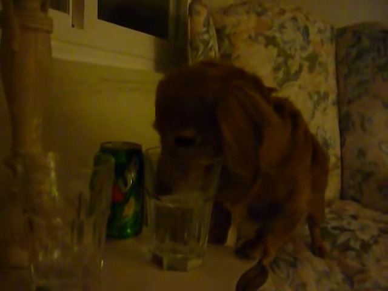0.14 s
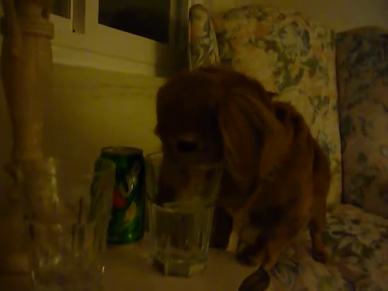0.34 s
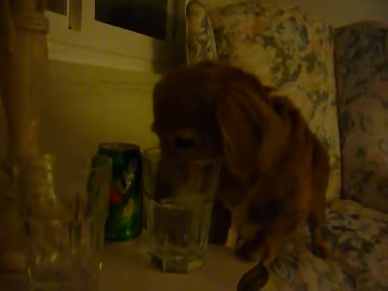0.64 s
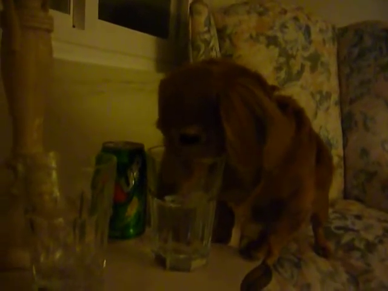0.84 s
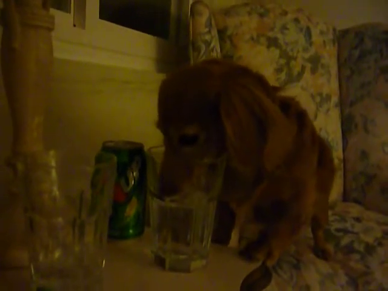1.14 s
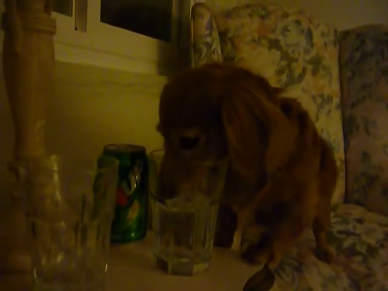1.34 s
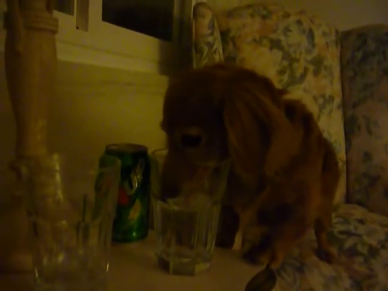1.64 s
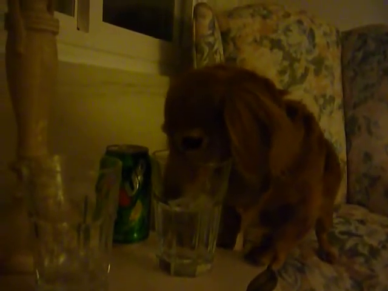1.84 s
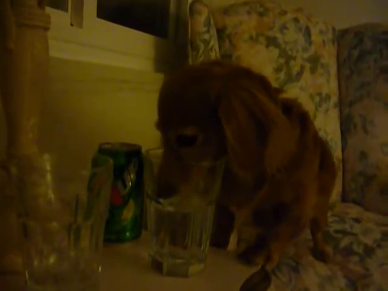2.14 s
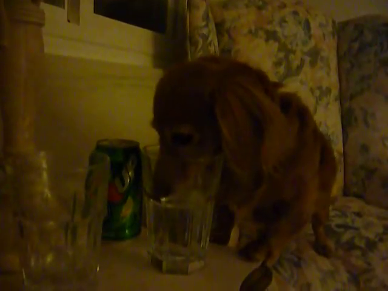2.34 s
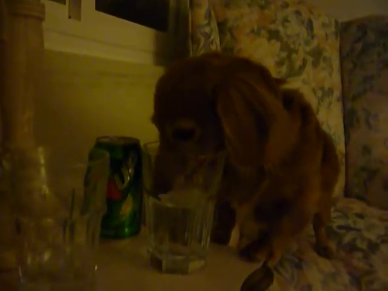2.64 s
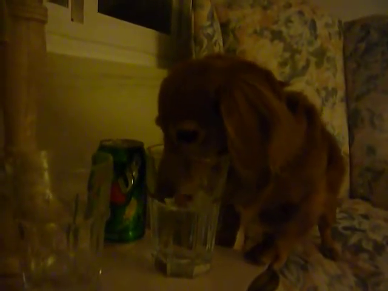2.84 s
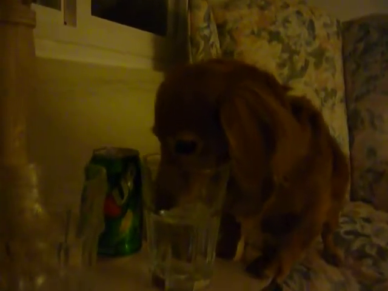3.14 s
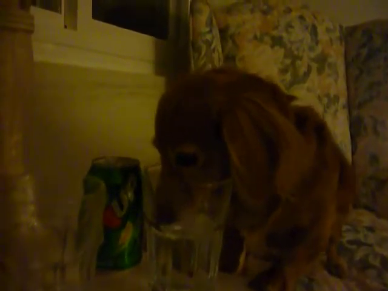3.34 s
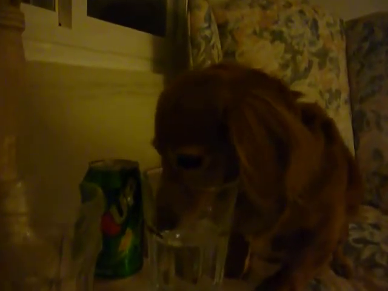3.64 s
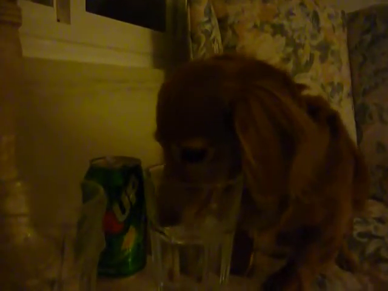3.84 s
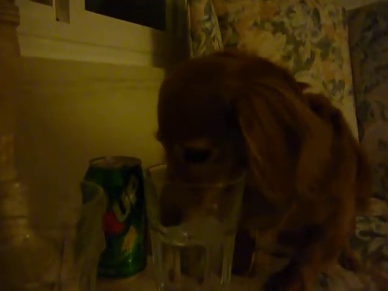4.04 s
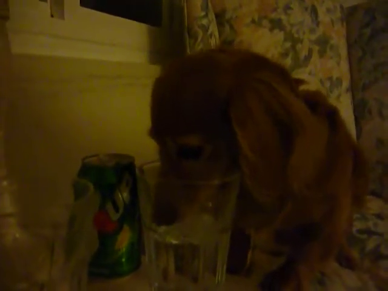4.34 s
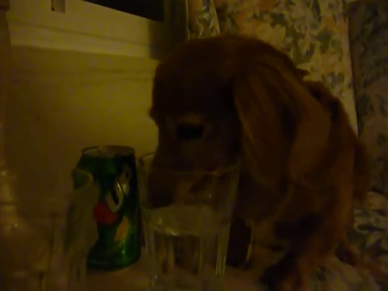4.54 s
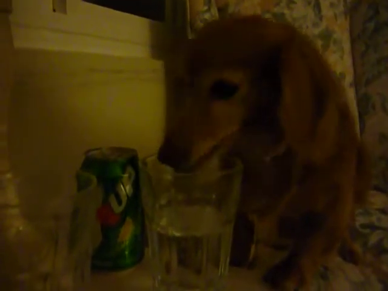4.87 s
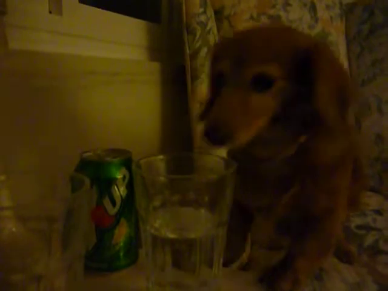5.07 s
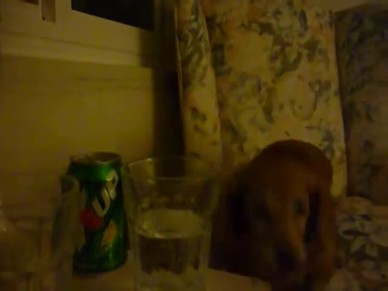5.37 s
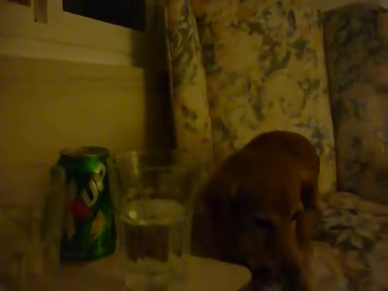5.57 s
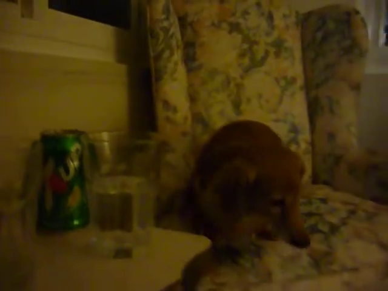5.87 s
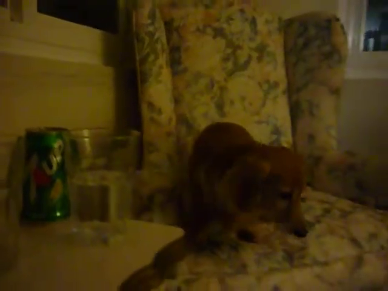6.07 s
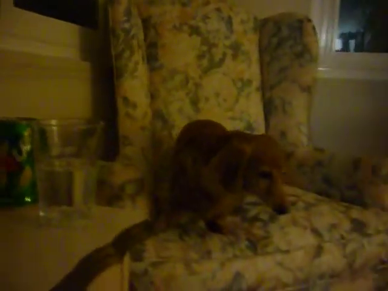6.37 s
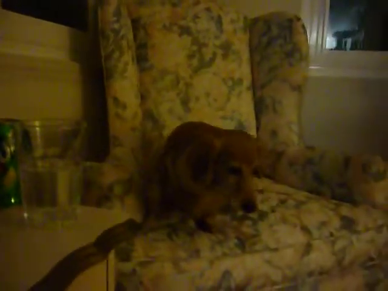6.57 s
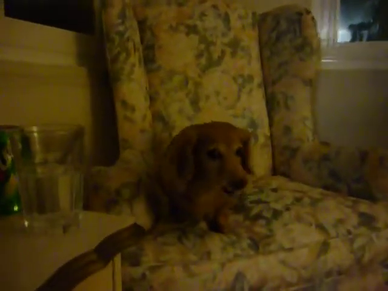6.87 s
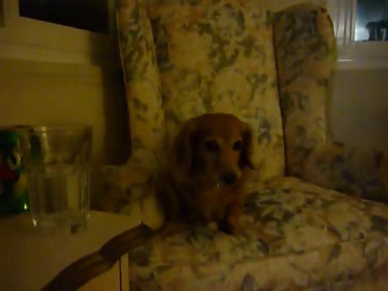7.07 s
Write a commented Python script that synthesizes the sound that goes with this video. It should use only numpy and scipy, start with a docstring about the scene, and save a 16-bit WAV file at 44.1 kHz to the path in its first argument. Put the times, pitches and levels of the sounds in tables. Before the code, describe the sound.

Close up in a quiet, softly furnished living room, a small dog laps from a half-full tumbler, about three wet strokes a second, each a plop with droplets and hollow glass resonance. After five seconds it stops; paws and fur scuff on upholstery, then thin out, and a sharp little lip smack follows. A small camera microphone adds steady hiss, faint whine and tiny clicks.

```python
"""Quick wet laps with droplets and a hollow glassy ring, then paws and fur rustling and a smack of the lips:
a small dog drinks from a tumbler on a side table in a soft living room and steps back onto an armchair.
The water is made of popping air bubbles, heard straight and through the resonances of the tumbler.
Rubs are gritty bands of noise; the table hums low around each push. The dog and the glass echo in the room.
Small dry clicks, steady hiss and a thin whine lie around it all."""
import sys
import numpy as np
from scipy import signal
from scipy.fft import rfft, irfft
from scipy.io import wavfile

SR = 44100
rng = np.random.default_rng(int(sys.argv[2]) if len(sys.argv) > 2 else 0)


def generate_wav(signal):
    """Clip the signal to [-1, 1] and save it as 16-bit WAV at the path in sys.argv[1]."""
    frames = np.transpose(np.atleast_2d(signal))
    scaled = np.clip(frames, -1, 1) * 32767
    pcm = np.round(scaled).astype(np.int16)
    wavfile.write(sys.argv[1], SR, pcm)


N = 317961  # length in samples


def lapping():
    """Slaps, droplets and spray pop as bubbles, heard straight and through the air column of the tumbler."""
    # tongue on water and gulps: t/s, level before the pop envelope/dB, starting pitch/Hz
    slap_hits = [(0.058, -30.5, 1250), (0.134, -38.5, 910), (0.264, -41, 540), (0.369, -39, 800),
                 (0.451, -33.5, 1230), (0.466, -39.5, 1090), (0.505, -39, 1220), (0.54, -47, 910),
                 (0.681, -39, 1000), (0.765, -29.5, 654), (0.771, -29.5, 1030), (0.814, -39.5, 770),
                 (0.825, -37.5, 790), (0.84, -34, 1020), (1.019, -22, 921), (1.02, -22.5, 1230),
                 (1.03, -36, 906), (1.109, -37, 930), (1.303, -20.5, 1237), (1.315, -29, 1120),
                 (1.35, -34.5, 820), (1.382, -33.5, 930), (1.396, -40, 900), (1.502, -39.5, 520),
                 (1.676, -23.5, 1090), (1.745, -40, 660), (1.807, -39.5, 502), (1.967, -27, 1130),
                 (1.976, -21, 1010), (1.992, -47, 1030), (2.056, -38.5, 970), (2.251, -25.5, 1110),
                 (2.295, -39.5, 920), (2.325, -36.5, 736), (2.338, -47, 750), (2.457, -45, 590),
                 (2.614, -22.5, 1080), (2.687, -33.5, 850), (2.722, -36.5, 1100), (2.758, -45, 473),
                 (2.905, -32, 1086), (2.947, -27, 770), (2.974, -48, 420), (2.986, -34.5, 1050),
                 (3.058, -43, 1040), (3.119, -39.5, 507), (3.2735, -21, 1240), (3.277, -16, 860),
                 (3.3, -46, 850), (3.344, -33, 1030), (3.39, -38, 950), (3.415, -47, 1100),
                 (3.563, -24, 1030), (3.633, -43, 490), (3.649, -37, 970), (3.696, -43, 1020),
                 (3.732, -52, 1060), (3.86, -21, 1110), (3.868, -18, 1070), (3.927, -35.5, 570),
                 (3.935, -32.5, 1080), (4.036, -43, 504), (4.047, -41, 500), (4.067, -40.5, 1100),
                 (4.236, -27.5, 1130), (4.316, -43, 750), (4.335, -48.5, 1100), (4.367, -46, 1030),
                 (4.537, -29.5, 1250), (4.587, -30.5, 760), (4.604, -43, 453), (4.625, -38, 900),
                 (4.66, -45, 1050), (4.72, -44.5, 1050), (4.752, -41, 1020), (4.85, -39.5, 1020),
                 (4.864, -39.5, 1160), (4.93, -43, 1050), (5.034, -42.5, 420), (5.049, -34, 726)]
    # droplets flicked up by the tongue:
    # t/s, level before the pop envelope/dB, starting pitch/Hz, swarm relative level/dB
    droplets = [(0.051, -38, 3070, -1), (0.138, -38, 2400, -4.5), (0.369, -46.5, 2970, -1),
                (0.449, -44.5, 3150, 7.5), (0.497, -37, 2130, -12), (0.669, -48.5, 2560, 5),
                (0.765, -33.5, 2750, -11), (0.831, -48.5, 2720, 3), (1.008, -40, 2780, -23),
                (1.019, -23.5, 2800, -19), (1.121, -52, 2600, 5), (1.164, -34.5, 2480, -17),
                (1.305, -25, 2700, -20), (1.661, -41.5, 2970, -5), (1.6825, -41, 3200, 2),
                (1.748, -40, 2210, -7), (1.815, -46, 2630, -9), (1.9697, -38.5, 2970, -4),
                (1.981, -31, 2740, -26), (2.05, -40, 2460, -5), (2.2471, -27.5, 2960, -2),
                (2.618, -33, 2980, 3), (2.6872, -37.5, 2300, -8), (2.7644, -45, 2440, -29),
                (2.91, -35.5, 3080, -0.5), (2.9711, -48, 2200, -4), (2.9853, -38, 2340, -12),
                (3.2625, -27.5, 3280, -5), (3.273, -29.5, 4080, -18), (3.333, -41.5, 2240, -18),
                (3.413, -44, 2490, -10), (3.5584, -47, 2780, -3), (3.562, -41.5, 2930, 6.5),
                (3.645, -46.5, 2160, 5), (3.702, -47, 2340, -11), (3.716, -43.5, 2660, 1),
                (3.8463, -36.5, 3040, -15), (3.864, -34, 2740, -18), (3.8695, -30.5, 2830, -8),
                (3.905, -42.5, 3970, -6), (3.923, -33, 2050, -11), (4.236, -35, 3200, -1),
                (4.317, -39, 2180, -4), (4.5205, -48, 2650, -9), (4.615, -48, 2290, 6),
                (4.667, -45.5, 3640, -6), (4.846, -47, 4300, -5), (4.859, -37.5, 3200, 0),
                (4.918, -42.5, 3160, -20), (4.953, -47, 3280, 0), (4.971, -54, 4530, 2),
                (4.993, -48, 3350, -17), (5.098, -42, 2170, -11)]
    # fine spray thrown up by the tongue: t/s, level before the pop envelope/dB, starting pitch/Hz
    spray_drops = [(0.0531, -36.5, 5070), (0.144, -48, 6700), (0.368, -49.5, 6030), (0.4522, -34, 4700),
                   (0.7665, -40, 5030), (1.006, -47, 6060), (1.022, -36.5, 4630), (1.308, -37.5, 4900),
                   (1.671, -37, 4800), (1.969, -50, 5130), (1.98, -37.5, 4330), (2.2488, -38.5, 5940),
                   (2.335, -49.5, 4940), (2.607, -47, 6100), (2.618, -41.5, 4600), (2.903, -49, 5000),
                   (3.264, -44, 5750), (3.275, -38, 6030), (3.5584, -50, 4840), (3.564, -40.5, 5740),
                   (3.861, -41.5, 4840), (4.225, -47, 4340), (4.233, -33.5, 5320), (4.3171, -48, 6200),
                   (4.523, -46, 4800), (4.8426, -38, 6300), (4.9486, -43.5, 4800), (5.0843, -49.5, 5390),
                   (5.099, -45.5, 5170)]
    # air column of the tumbler: f/Hz, width/Hz, relative level/dB
    glass_modes = [(431, 77, 1), (764, 160, 6), (905, 124, 0.5), (1051.7, 55, 9.5), (1297, 95, 3.5),
                   (1422, 167, 6.5), (1740, 110, -5), (2602, 80, 0.5), (3540, 38, -27.5), (4700, 140, -33),
                   (6100, 2100, -5)]
    # how freely the tumbler rings, as the muzzle stops its mouth more or less: t/s, level/dB
    opening = [(0, 4), (.9, 5), (1.5, 5.5), (2.2, 3.5), (2.8, 3.5), (3.3, 3), (3.6, 5), (4.2, 4.5),
               (5.1, 4.5)]

    # each row gains: decay/cycles, swarm time/s, swarm relative level/dB
    slap_rows = [(*row, 1.5, 0.012, -11) for row in slap_hits]
    # lone drops ring longer than splashy ones
    drop_rows = [(s, db, hz, 3.2 - 0.0993 * swarm_db, 0.0075, swarm_db) for s, db, hz, swarm_db in droplets]
    spray_rows = [(*row, 4, 0.01, -4) for row in spray_drops]

    slaps = bubbles(slap_rows, glide=0.0091, spread=0.21, scatter_db=4.0,
                    rise_turns=0.23, lead=0.000994, count=15)
    drops = bubbles(drop_rows, glide=0.002, spread=0.15, scatter_db=4.0,
                    rise_turns=0.12, lead=0.0055, count=14)
    spray = bubbles(spray_rows, glide=0.0014, spread=0.22, scatter_db=2.5,
                    rise_turns=0.097, lead=0.0046, count=18)
    wet = slaps + drops + spray + trickle()

    opening_t, opening_db = np.transpose(opening)
    freedom = undb(np.interp(np.arange(N) / SR, opening_t, opening_db))
    return wet + body(wet * freedom, glass_modes)


def trickle(count=90):
    """Small bubbles at random moments as water runs back between strokes."""
    drink_until_s, level_db, middle_hz, pitch_spread = 4.7, -54.5, 1120, 0.496
    when, tone = rng.random(count), rng.standard_normal(count)
    starts = drink_until_s * when + 0.01
    pitches = middle_hz * np.exp(pitch_spread * tone)
    rows = [(s, level_db, hz, 3.0, 0.015, -5) for s, hz in zip(starts, pitches)]
    return bubbles(rows, glide=0.011, spread=0.12, scatter_db=3.0, rise_turns=0.32, lead=0.001, count=3)


def smacks():
    """Dry snaps of the lips, each with a trail of mostly smaller ones at nearly the same pitch."""
    # lip smacks on the armchair: t/s, level before the pop envelope/dB, starting pitch/Hz
    lip_snaps = [(6.8078, -32.5, 3080), (6.81, -36, 5700), (6.8226, -22, 4930), (6.8299, -22.5, 4730),
                 (6.8293, -25.5, 2570)]
    rows = [(*row, 4, 0.012, -14) for row in lip_snaps]  # decay/cycles, swarm time/s, swarm level/dB
    return bubbles(rows, glide=0.0013, spread=0.081, scatter_db=0.0, rise_turns=0.24, lead=0.0001, count=12)


def bubbles(rows, glide, spread, scatter_db, rise_turns, lead, count, size=1500):
    """Each air pocket pops with a rising pitch among a swarm of other pockets that thins out and weakens."""
    out, t = np.zeros(N + SR), np.arange(size) / SR
    for s, db, hz, cycles, swarm_s, swarm_db in rows:
        # evenly stratified draws make delays that thin out in time
        late = -np.log(1 - (np.arange(count) + rng.random(count)) / count)
        tone, big = rng.standard_normal((2, count))
        after = swarm_s * late - lead  # the first may come just before the main pop
        starts = s + np.r_[0, after]
        pitch = np.minimum(hz * np.exp(spread * np.r_[0, tone]), 9000)

        early_cut_db = 7 * (after < 0)
        follower_db = swarm_db + scatter_db * big - 4 * late - early_cut_db
        polarity = np.r_[1, np.sign(tone * big)]
        gain = undb(db + np.r_[0, follower_db]) * polarity

        turns = pitch[:, None] * t  # cycles at the starting pitch
        rise = 1 - np.exp(-(turns / rise_turns) ** 2)
        decay = np.exp(-turns / cycles)
        pops = np.sin(2 * np.pi * turns * (1 + glide * turns)) * decay * rise
        for i, g, pop in zip((starts * SR).astype(int), gain, pops):
            out[i:i + size] += g * pop
    return out[:N]


def rustles(grain_db=5.5, catch_db=5.0, size=12000, count=80):
    """Gritty rubbing in one band that catches every few milliseconds: swells, then dies away."""
    # fur, paws and lips away from the glass:
    # t/s, rms level before the envelope/dB, centre f/Hz, width of each filter pass/Hz, fall time/s
    rubs = [(5.194, -39.5, 2000, 4000, 0.0069), (5.211, -26, 1600, 1600, 0.0075),
            (5.213, -35, 550, 500, 0.0087), (5.21, -33, 6000, 6000, 0.0083),
            (5.225, -44, 5500, 5050, 0.022), (5.235, -43, 770, 1500, 0.0099),
            (5.198, -33.5, 604, 700, 0.0041), (5.262, -39.5, 251, 300, 0.025),
            (5.274, -37, 900, 1200, 0.0048), (5.25, -53, 900, 1510, 0.06), (5.3, -46, 230, 200, 0.034),
            (5.359, -49, 1290, 1500, 0.012), (5.315, -40, 700, 900, 0.012),
            (5.326, -40.5, 3500, 5000, .014), (5.341, -30, 5400, 2000, 0.0097),
            (5.345, -39, 950, 900, 0.015), (5.356, -45, 5960, 3500, 0.004), (5.387, -43, 300, 398, .025),
            (5.453, -43, 690, 1170, 0.009), (5.775, -43.5, 890, 2490, 0.013), (5.781, -46, 454, 500, 0.013),
            (5.978, -44, 400, 503, 0.018), (6.021, -53, 1390, 500, 0.014), (6.265, -50, 4100, 4000, 0.026),
            (6.276, -43.5, 1210, 1010, 0.017), (6.459, -45, 2480, 3500, 0.0054),
            (6.823, -36.5, 1190, 2000, .004), (6.83, -35, 1290, 2500, 0.0034),
            (6.838, -39, 2300, 695, 0.013), (7.089, -58, 4340, 1200, 0.06)]
    rise_share = 0.18  # rise time as a share of the fall time
    out, t = np.zeros(N + size), np.arange(size) / SR
    for s, db, hz, width_hz, fall_s in rubs:
        noise, grain = rng.standard_normal((2, size))
        catch = np.repeat(rng.standard_normal(count), size // count)
        grit = noise * undb(grain_db * grain + catch_db * catch)
        grit = ring(ring(grit, hz, width_hz), hz, width_hz)
        swell = 1 - np.exp(-(t / (rise_share * fall_s)) ** 2)
        start = int(s * SR)
        out[start:start + size] += level(grit, db) * swell * np.exp(-t / fall_s)
    return out[:N]


def table_top():
    """Noise through low wooden resonances: a hum that swells up to each push and fades after it."""
    # pushes from the drinking and the paws: t of the crest/s, level/dB
    pushes = [(0.13, -52), (0.23, -65), (0.55, -51), (0.84, -59), (1.11, -47.5), (1.39, -44), (1.56, -65),
              (1.77, -45.5), (2.04, -49.5), (2.31, -48), (2.42, -64), (2.68, -50), (2.8, -59),
              (2.99, -43.5), (3.35, -50), (3.5, -57.5), (3.68, -60.5), (4.33, -49.5), (4.6, -46),
              (4.7, -55.5), (5.12, -62), (5.21, -60), (5.29, -50.5), (5.4, -53), (5.6, -57)]
    # resonances of the table top: f/Hz, width/Hz, relative level/dB
    wood_modes = [(121, 30.5, 0), (167, 29.5, -2), (265, 137, -9)]
    rise_db_s, fall_db_s = 173, 130.5  # slopes in dB per second
    t = np.arange(N) / SR
    swell = np.zeros(N)
    for s, db in pushes:
        below_crest_db = np.maximum(rise_db_s * (s - t), fall_db_s * (t - s))
        swell += undb(db - below_crest_db)
    return swell * level(body(rng.standard_normal(N), wood_modes), 0)


def clicks(hz=7400.0, width_hz=1300.0, count=70):
    """Short dry snaps: impulses through a high narrow resonance, with more at random moments."""
    # tiny dry clicks close to the microphone: t/s, peak level/dB
    near_clicks = [(0.2678, -49), (0.4514, -49), (1.02, -35), (1.1657, -48), (1.2067, -48), (1.3064, -40),
                   (1.7505, -43), (1.8457, -48), (1.955, -48), (1.9994, -50), (2.246, -40), (2.6125, -43),
                   (2.7856, -47), (2.9746, -46), (3.273, -37), (3.8606, -41), (3.93, -44), (5.1223, -46),
                   (5.1667, -47), (5.6655, -52), (5.784, -48), (6.1574, -48), (6.6127, -45), (7.012, -47)]
    s, db = np.transpose(near_clicks)
    out = np.zeros(N)
    out[(s * SR).astype(int)] = undb(db)
    # a sprinkle of mostly fainter clicks
    faint_db, scatter_db = -56, 5.5
    out[rng.integers(N, size=count)] += undb(faint_db + scatter_db * rng.standard_normal(count))
    snap = ring(ring(signal.unit_impulse(shape=64), hz, width_hz), hz, width_hz)
    return np.convolve(out, snap / np.abs(snap).max())[:N]


def room(x):
    """Uneven echoes from nearby furniture that start after a few milliseconds and lose their treble first."""
    t60_s, dull_hz, lumpy_db, room_db = 0.22, 2550, 7.5, -10
    t = np.arange(SR // 2) / SR
    fall = np.log(1000) * t / t60_s
    noise = rng.standard_normal(len(t)) * undb(lumpy_db * rng.standard_normal(len(t)))
    dull = signal.lfilter(*signal.butter(1, dull_hz, fs=SR), noise)
    bright = noise - dull
    tail = dull * np.exp(-fall) + 0.5 * bright * np.exp(-2.2 * fall)
    tail *= t > 0.005  # s before the first echo
    tail /= np.sqrt(np.sum(tail ** 2))
    return signal.fftconvolve(x, undb(room_db) * tail)[:N]


def hiss():
    """Steady shaped noise of room and preamplifier, with a thin whine of very narrow noise."""
    # noise spectrum: f/Hz, relative level per hertz/dB
    hiss_curve = [(60, -10.5), (150, -5), (250, -5), (360, -7), (500, -7.5), (750, -10.5), (1000, -12),
                  (1500, -16.5), (2100, -18.5), (3400, -21.5), (5500, -24.5), (7500, -24), (10000, -39.5)]
    hiss_db, whine_db = -54, -75.5  # rms levels
    whine_hz, whine_width_hz = 5380, 18
    hz = np.maximum(np.arange(N // 2 + 1) * SR / N, 1)
    f, db = np.transpose(hiss_curve)
    colour = undb(np.interp(np.log(hz), np.log(f), db))
    noise = irfft(rfft(rng.standard_normal(N)) * colour, N)
    whine = ring(rng.standard_normal(N), whine_hz, whine_width_hz)
    return level(noise, hiss_db) + level(whine, whine_db)


def undb(db):
    """Decibels to gain."""
    return 10 ** (np.asarray(db) / 20)


def level(x, db):
    """Scale to an rms level."""
    return x * undb(db) / np.sqrt(np.mean(x ** 2))


def ring(x, hz, width_hz):
    """One resonance, gain 1 at its centre."""
    return signal.lfilter(*signal.iirpeak(hz, hz / width_hz, fs=SR), x)


def body(x, modes):
    """Sum of resonances with alternating sign."""
    return sum((-1) ** k * undb(db) * ring(x, hz, width_hz) for k, (hz, width_hz, db) in enumerate(modes))


def scene():
    """Dog and glass with their echoes, over the table hum, clicks and hiss."""
    dog = lapping() + rustles() + smacks()
    return (dog + room(dog) + table_top() + clicks() + hiss())[None]


def record(dry):
    """The microphone loses bass and treble; the camera cuts the top and sits on a constant offset."""
    mic_low_hz, mic_high_hz, top_hz, offset = 71, 7320, 8834, -0.0491
    mic = signal.sosfilt(signal.butter(2, mic_low_hz, "high", fs=SR, output="sos"), dry)
    mic = signal.sosfilt(signal.butter(8, mic_high_hz, fs=SR, output="sos"), mic)
    return signal.sosfilt(signal.ellip(8, 0.2, 70, top_hz, fs=SR, output="sos"), mic) + offset


dry = scene()
out = record(dry)
generate_wav(out)
```